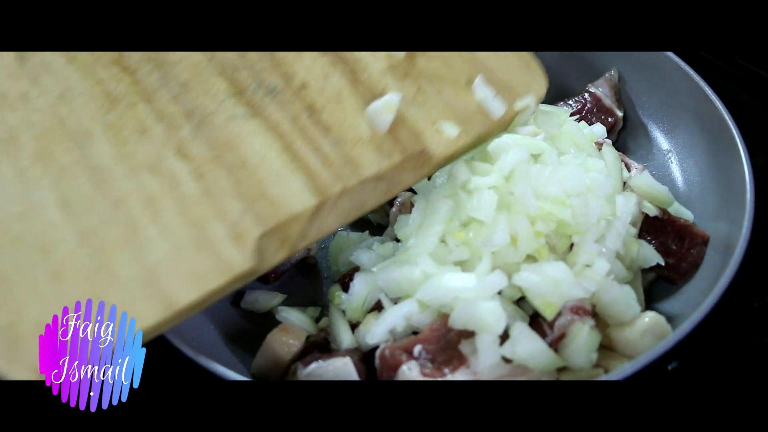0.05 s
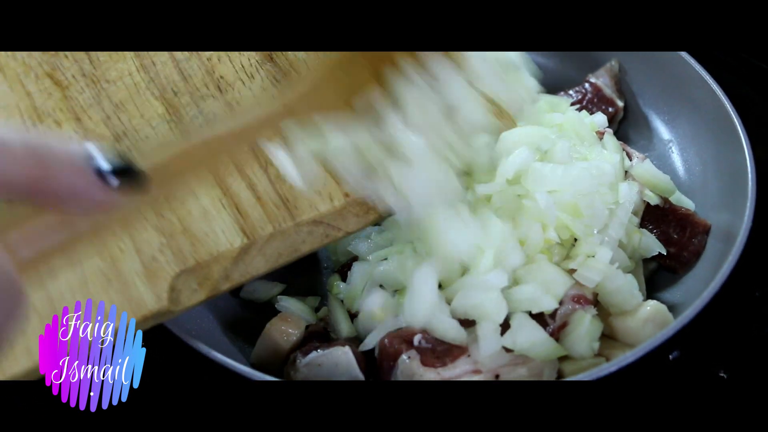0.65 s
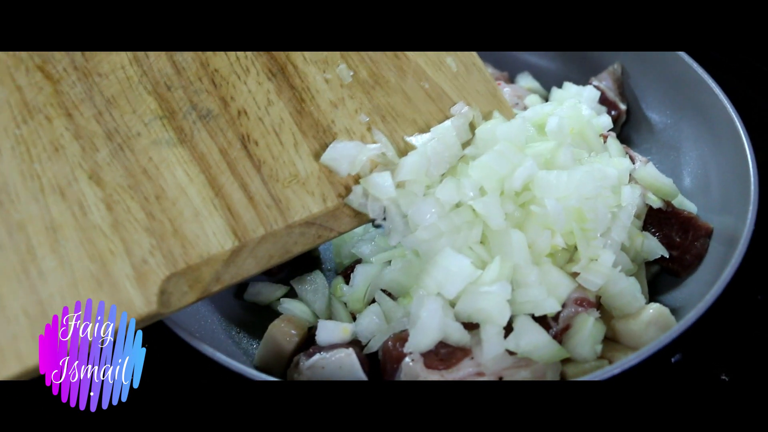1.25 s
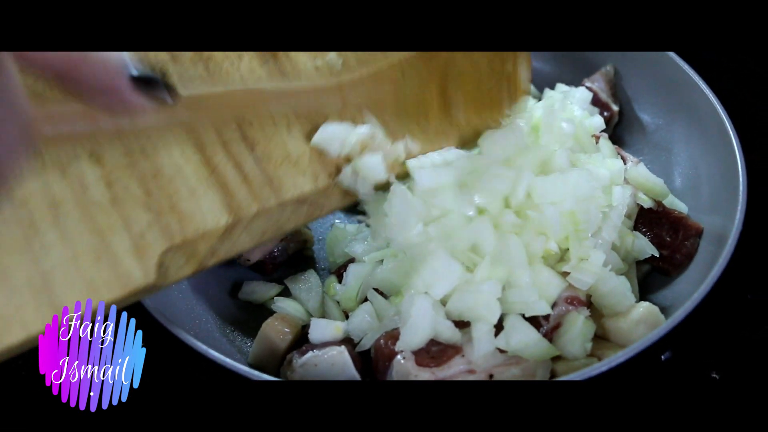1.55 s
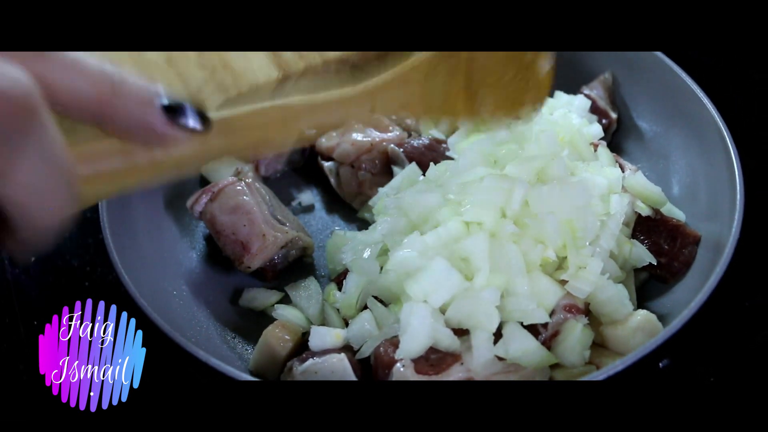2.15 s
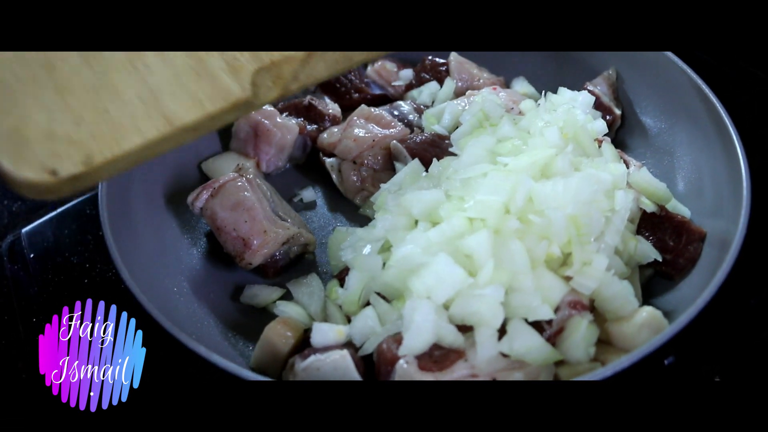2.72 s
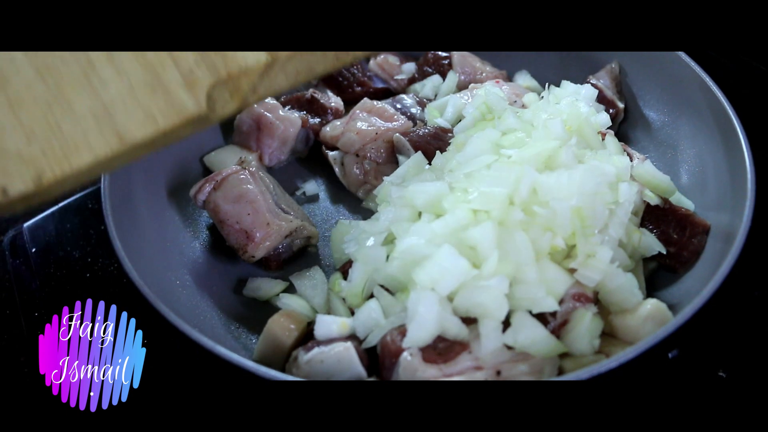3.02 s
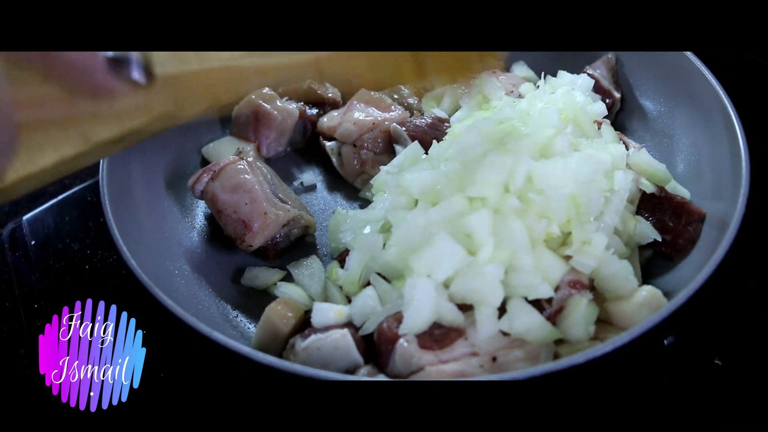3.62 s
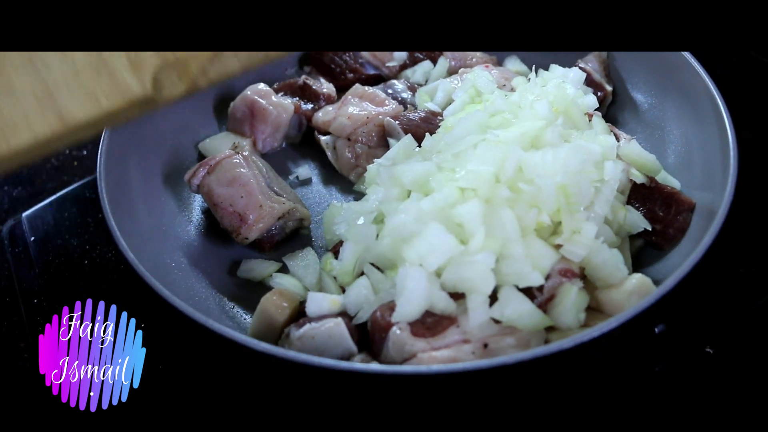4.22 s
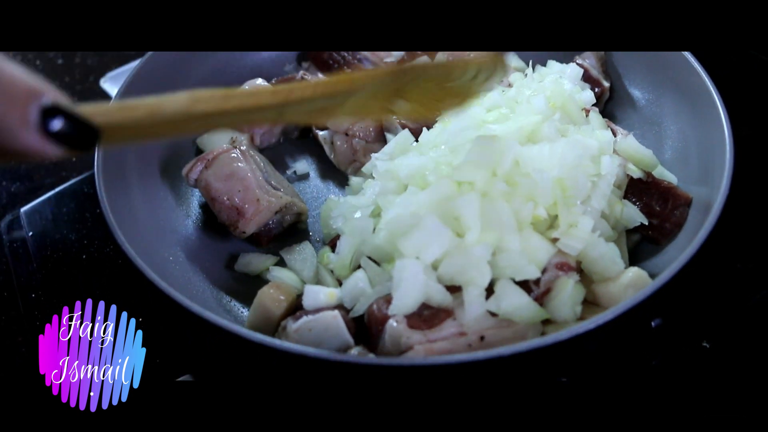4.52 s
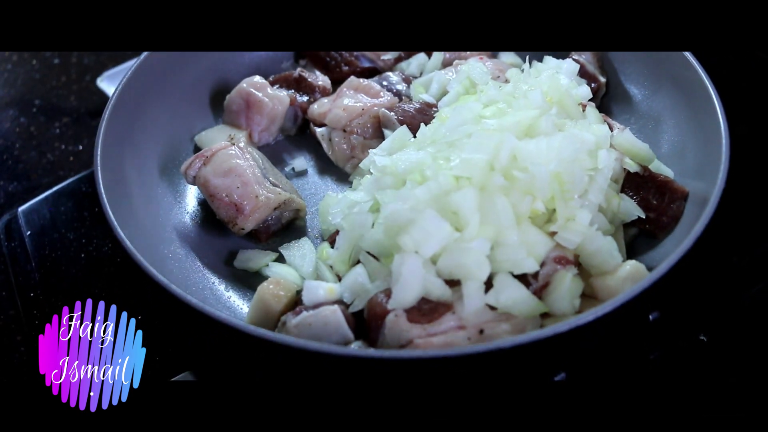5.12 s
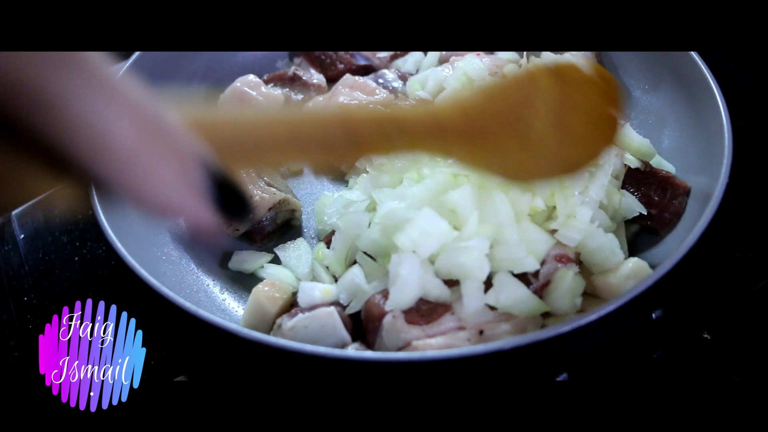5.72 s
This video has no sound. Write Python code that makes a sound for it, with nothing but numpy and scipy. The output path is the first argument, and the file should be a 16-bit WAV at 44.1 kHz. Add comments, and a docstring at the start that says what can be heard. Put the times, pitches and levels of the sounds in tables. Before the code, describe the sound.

Close rasping scrapes and loud wooden knocks on a cutting board, with onion dropping softly over a light frying sizzle.

```python
"""Rasping scrapes and sharp wooden knocks, close by in a small kitchen: a wooden spoon pushes chopped
onion off a board into a frying pan. The spoon slips and catches on the grain, ringing both itself and
the board, and the hardest knocks overload into a limiter. Onion drops with soft thuds. Underneath,
meat sizzles as steam bubbles burst in the fat, over a low rumble and a faint mains hum."""
import sys
import numpy as np
from scipy import signal
from scipy.fft import rfft, irfft
from scipy.io import wavfile
from scipy.ndimage import uniform_filter1d, minimum_filter1d

SR = 44100
rng = np.random.default_rng(int(sys.argv[2]) if len(sys.argv) > 2 else 0)


def to_wav(sig):
    """Store sig (one row per channel, or 1-D mono) as 16-bit WAV at the path in sys.argv[1].

    Samples outside -1..1 are clipped; the rate is SR.
    """
    pcm = np.clip(np.atleast_2d(sig), -1, 1) * 32767
    pcm = np.round(pcm).astype(np.int16)
    wavfile.write(sys.argv[1], SR, pcm.T)  # frames by channels


N = 254456
TIME, BINS = np.arange(N) / SR, np.fft.rfftfreq(N, 1 / SR)

# Pushes of the spoon over the board. Each row: start, swell time and easing time in seconds, swell and
# easing depth in dB, relative rasp, spoon and board levels at the hardest moment in dB, the spoon's
# bending resonance in Hz, favoured grain resonance in Hz, treble slope in dB per octave.
PUSHES = [ (0.0, 0.047, 0.056, 2.5, 6, -29.5, -24, -23, 1259, 1600, 0.5),
          (0.104, 0.034, 0.022, 10.5, 6, -29, -26, -17.5, 1340, 5800, 2),
          (0.172, 0.35, 0.02, 17.5, -4, -38, -41, -23.5, 1330, 3350, 4.5),
          (0.514, 0.068, 0.056, 4, 2.5, -24, -20.5, -24.5, 1315, 3350, -3),
          (0.64, 0.039, 0.05, 2.5, 3.5, -25.5, -25.5, -29.5, 1318, 5200, 1),
          (1.112, 0.278, 0.029, 16.5, 7, -20.5, -24.5, -21.5, 1336, 2770, -3.5),
          (1.41, 0.095, 0.078, 4.5, 4.5, -21, -23.5, -22, 1318, 3770, -1.5),
          (1.87, 0.13, 0.06, 13, 5.5, -24, -29, -21, 1292, 2760, -2),
          (2.04, 0.03, 0.09, 5, 3.5, -24.5, -23, -30, 1311, 5900, 0.5),
          (2.597, 0.022, 0.029, 8, 4, -26.5, -24, -24.5, 1315, 5430, -1.5),
          (2.651, 0.057, 0.041, 7.5, 7.5, -26.5, -25, -20.5, 1318, 5600, -1),
          (2.768, 0.1, 0.021, 8, 4.5, -20, -24.5, -28, 1313, 6300, 0.5),
          (3.33, 0.11, 0.078, 10, 7, -23, -19, -20.5, 1335, 5140, -2),
          (3.51, 0.13, 0.012, 6.5, 2.5, -23, -25, -24, 1281, 5960, 1.5),
          (4.058, 0.078, 0.044, 13.5, 9, -25, -25, -22.5, 1293, 2750, 0),
          (5.203, 0.061, 0.029, 7, 6.5, -27, -25.5, -21, 1280, 8400, -0.5)]
RASP, SPOON, BOARD = 5, 6, 7  # the level columns


def amp(db):
    """Decibels to gain."""
    return 10 ** (np.asarray(db) / 20)


def unit(x):
    """Scales to rms 1."""
    return x / np.sqrt(np.mean(x ** 2) + 1e-20)


def read(points, hz):
    """Reads a curve on a log-frequency axis."""
    point_hz, value = np.transpose(points)
    return np.interp(np.log(hz + 1), np.log(point_hz + 1), value)


def add(mix, start_s, sound):
    """Mixes a sound in at its start time."""
    part = mix[max(round(start_s * SR), 0):][:len(sound)]
    part += sound[:len(part)]


def colour(x, db):
    """Equalises by a dB curve over BINS and scales to rms 1."""
    return unit(irfft(rfft(x) * amp(db), N))


def wander(hz):
    """A random drift of rms 1, moving at up to about the given rate."""
    knots = np.arange(0, TIME[-1] + 1, .5 / hz)
    return unit(np.interp(TIME, knots, rng.standard_normal(len(knots))))


def resonate(x, hz, width_hz):
    """A band-pass resonance of gain 1."""
    return signal.lfilter(*signal.iirpeak(hz, hz / width_hz, SR), x)


def ring(slips, hz, width_hz):
    """One steep-sided resonance, which every slip drives with a random strength."""
    drive = slips * rng.standard_normal(N)
    return resonate(resonate(drive, hz, 1.18 * width_hz), hz, 3.8 * width_hz)


def clicks(per_s, spread_db):
    """Random clicks of either sign, a few louder than the rest."""
    size = amp(spread_db * np.minimum(rng.exponential(1, N), 5))
    return unit(size * rng.choice([-1, 1], N) * (rng.random(N) < per_s / SR))


def room_tone(rumble_db=-48, hum_hz=98, hum_db=-52, waver_db=2):
    """A bed of low room rumble and wavering mains hum."""
    # The rumble's colour. Each row: frequency in Hz, relative level in dB.
    rumble_eq = [(15, 0.5), (30, 2.5), (55, -12), (85, -3.5), (125, -9), (200, -10.5), (320, -7),
                 (700, -56)]
    hum = np.sqrt(2) * np.sin(2 * np.pi * hum_hz * TIME) * amp(hum_db + waver_db * wander(1.56))
    return hum + amp(rumble_db) * colour(rng.standard_normal(N), read(rumble_eq, BINS))


def kitchen(x, near_db=-15, near_t60=0.051, tail_db=-18):
    """Adds quick echoes from pan and stove top, then the faint tail of the room."""
    # The room's decay. Each row: frequency in Hz, t60 in seconds.
    decay_times = [(100, 0.63), (500, 0.72), (1300, 0.52), (4000, 0.48), (14000, 0.23)]
    t = np.arange(SR // 2) / SR
    early, late = rng.standard_normal((2, len(t)))
    early *= amp(-60 * t / near_t60) * (t > .002)
    hz, frame_s, bands = signal.stft(late * (t > .008), SR, nperseg=256)
    bands *= amp(-60 * frame_s / read(decay_times, hz)[:, None])
    late = signal.istft(bands, SR, nperseg=256)[1][:len(t)]
    echoes = amp(near_db) * early / np.linalg.norm(early) + amp(tail_db) * late / np.linalg.norm(late)
    return x + signal.fftconvolve(x, echoes)[:N]


def sizzle(pops_db=-5, flicker_db=1.5, open_at_s=1.6, opening_s=3):
    """Countless steam bubbles burst in the fat; the hiss opens up as the board is drawn away."""
    # The sizzle's fader. Each row: time in seconds, level in dB.
    fader = [(0, -36), (1.0, -37), (1.75, -38.5), (2.3, -36), (3.1, -35), (3.85, -34.5), (4.5, -33.5),
             (5.77, -32)]
    # Its colour, shaded by the board and in the open. Each row: frequency in Hz, relative level in dB.
    shaded_eq = [(150, -4), (400, -5), (900, -5), (1200, -1), (1900, -5.5), (2600, -4.5), (3600, -7),
                 (5200, -6), (7000, -7), (10000, -12.5), (13500, -16), (15700, -24)]
    open_eq = [(150, -4.5), (400, -6), (900, -2.5), (1200, -2), (1900, -0.5), (2600, -0.5), (3600, -2.5),
               (5200, -2.5), (7000, -4), (10000, -9.5), (13500, -12.5), (15700, -19.5)]
    # Peaks and dips from echoes in the pan. Each row: centre and width in Hz, gain in dB.
    pan_eq = [(1240, 190, 3.5), (2570, 120, 2.5), (5050, 1100, 1), (6400, 530, -3.5), (6890, 180, 5.5),
              (8900, 150, 4), (9000, 390, -4), (10200, 360, 2.5)]
    bursts = rng.standard_normal(N) * amp(flicker_db * wander(36))
    bursts += amp(pops_db) * clicks(per_s=1500, spread_db=1.0)
    pan_db = sum(db * np.exp(-2 * ((BINS - hz) / width) ** 2) for hz, width, db in pan_eq)
    shaded = colour(bursts, read(shaded_eq, BINS) + pan_db)
    bright = colour(bursts, read(open_eq, BINS) + pan_db)
    uncovered = np.clip((TIME - open_at_s) / opening_s, 0, 1)
    hiss = (1 - uncovered) * shaded + uncovered * bright
    return hiss * amp(np.interp(TIME, *np.transpose(fader)))


def thuds(thump_hz=80, thump_rise_s=0.012, thump_trim_db=-4.5, plop_rise_s=0.0048):
    """Soft lumps land: a low thump and a brief dull plop."""
    # Onion and board meet the pan. Each row: start in seconds, relative thump and plop levels in dB,
    # plop pitch in Hz.
    landings = [(0.123, -22.5, -22, 455), (0.18, -31, -28, 468), (0.203, -27, -33.5, 450),
                (0.245, -29.5, -41, 400), (0.375, -27.5, -28, 490), (0.45, -42, -24.5, 640),
                (0.834, -27, -28, 450), (0.872, -35, -37, 475), (2.461, -30.5, -35.5, 377),
                (4.743, -34, -30, 370), (5.262, -47, -31, 329)]
    out, t = np.zeros(N), np.arange(SR // 5) / SR
    swell = lambda rise_s: t / rise_s * np.exp(1 - t / rise_s)
    band = lambda hz, width: unit(resonate(resonate(rng.standard_normal(len(t)), hz, width), hz, width))
    for start, thump_db, plop_db, plop_hz in landings:
        thump = amp(thump_db + thump_trim_db) * swell(thump_rise_s) * band(thump_hz, width=128)
        plop = amp(plop_db) * swell(plop_rise_s) * band(plop_hz, width=130)
        add(out, start, thump + plop)
    return out


def knocks(crack_t60=0.029, crack_trim_db=-4, board_hz=497, board_t60=0.06, spoon_hz=1320, favour_db=3):
    """A short contact rings the wood; the softer it is (onion in between), the less treble."""
    # Spoon hits on the board. Each row: start in seconds, wood level in dB, low-pass corner and favoured
    # resonance in Hz, crack and spoon levels in dB, spoon t60 in seconds, board level in dB.
    hits = [(0.1205, -25, 6500, 1020, -18.5, -9, 0.022, -23),
            (0.5635, -36, 12000, 3350, -26, -22, .02, -37),
            (1.0842, -2, 13900, 5240, -11, -29, 0.015, -17.5),
            (1.8532, -1.5, 14100, 3120, -6.5, 1, 0.02, -24.5),
            (2.5425, -28, 11000, 5500, -37, -32, .02, -32),
            (2.607, -18, 6500, 5270, -18, -11.5, 0.031, -45),
            (2.774, -17.5, 7500, 5700, -35, -31, 0.024, -23),
            (3.2766, -7, 7000, 1030, -7.5, 1.5, 0.02, -20), (3.648, -11, 6440, 5500, -21, -23, .03, -27),
            (4.0083, -4.5, 5900, 1020, -7, 0, 0.024, -21.5),
            (4.2585, -13.5, 7800, 4800, -19, -20.5, 0.046, -44),
            (4.3305, -12, 7040, 2800, -39, -29, 0.016, -37),
            (4.3321, -33, 2980, 2640, -36, -0.5, 0.044, -33), (5.0568, -9, 2270, 845, -2, 2, 0.022, -23),
            (5.0655, -18, 2290, 2350, -11.5, -5.5, 0.049, -35)]
    # The wood's modes. Each row: pitch in Hz, relative level in dB, t60 in seconds.
    wood_modes = [(1050, -15, 0.02), (1530, 0, 0.01), (1593, -7.5, 0.024), (1980, -46, 0.03),
                  (2570, -12, 0.026), (2883, -7.5, 0.021), (3260, -19, 0.026), (3890, -10, .02),
                  (4430, -10, 0.02), (5350, -6, 0.015), (5720, -8.5, 0.016), (6420, -1.5, 0.0046),
                  (8650, -7.5, 0.011), (10100, -5.5, 0.0044)]
    # The crack's colour. Each row: frequency in Hz, relative level in dB.
    crack_eq = [(120, -22), (450, -4), (750, 1), (1300, 3), (2200, 2), (5500, -6.5), (7500, -10),
                (10000, -12), (16000, -20)]
    out, t = np.zeros(N), np.arange(SR // 6) / SR
    noise = colour(rng.standard_normal(N), read(crack_eq, BINS))
    mode = lambda hz, db, t60: amp(db - 60 * t / t60) * np.sin(2 * np.pi * hz * t)
    for k, hit in enumerate(hits):
        start, wood_db, corner_hz, favoured_hz, crack_db, spoon_db, spoon_t60, board_db = hit
        wood = sum((-1) ** j * mode(hz, wood_db + db, t60) for j, (hz, db, t60) in enumerate(wood_modes))
        crack = noise[k * len(t):][:len(t)] * amp(crack_trim_db + crack_db - 60 * t / crack_t60)
        blow = signal.lfilter(*signal.butter(3, corner_hz, fs=SR), wood + crack)
        # the place of the blow favours one resonance
        blow += amp(favour_db) * resonate(blow, favoured_hz, 0.094 * favoured_hz)
        # the slow bending modes build up while the contact lasts
        contact_s = 2.75 / corner_hz
        bending = mode(spoon_hz, spoon_db, spoon_t60) - mode(board_hz, board_db, board_t60)
        add(out, start, blow + bending * (1 - np.exp(-(t / contact_s) ** 2)))
    # small wooden things radiate little bass
    return signal.lfilter(*signal.butter(2, 260, "high", fs=SR), out)


def after_ring(x, hz=491, width_hz=6, ring_db=-7):
    """A narrow ring near 490 Hz hums on briefly after every touch."""
    return x + amp(ring_db) * resonate(x, hz, width_hz)


def push_gain(column, follows, release_t60, fade_db=0, flick_db=0, attack_s=0.0061, flick_s=0.02):
    """One layer's envelope: each push bites, swells, eases and lifts off; follows scales the swell."""
    power = np.zeros(N)
    for push in PUSHES:
        start, swell_s, ease_s, swell_db, ease_db = push[:5]
        length = swell_s + ease_s
        t = np.arange(0, length + release_t60, 1 / SR)
        before, after = np.interp(t, [0, swell_s], [1, 0]), np.interp(t, [swell_s, length], [0, 1])
        pressure_db = -swell_db * before ** 1.02 - ease_db * after ** 1.02
        touch = np.minimum(t / attack_s, 1) * amp(-60 * np.maximum(t - length, 0) / release_t60)
        travel = np.interp(t, [0, length], [-.5, .5])
        flick = np.interp(t, [length - flick_s, length], [0, 1])  # over the board's edge
        level_db = push[column] + follows * pressure_db - fade_db * travel + flick_db * flick
        add(power, start, (touch * amp(level_db)) ** 2)
    return np.sqrt(power)


def squawk_gain(ring_on_db=-17, ring_on_t60=0.15):
    """Each catch on the grain swells and dies in one arch, and the spoon rings on faintly after it."""
    # The spoon's squawks. Each row: midpoint and length in seconds, relative level in dB.
    squawks = [(0.045, 0.025, -21), (0.121, 0.021, -16), (0.587, 0.07, -14), (1.236, 0.056, -13.5),
               (1.287, 0.063, -13), (1.352, 0.05, -15.5), (1.493, 0.056, -15), (1.906, 0.068, -22.5),
               (2.052, 0.11, -14.5), (2.152, 0.025, -19), (2.799, 0.044, -12), (2.882, 0.044, -11),
               (3.376, 0.078, -15), (3.431, 0.05, -13), (3.543, 0.028, -14.5), (3.642, 0.029, -10),
               (4.126, 0.053, -17.5)]
    gain, t = np.zeros(N), np.arange(SR // 3) / SR
    for middle, length, db in squawks:
        progress = np.minimum(t / length, 1)
        arch = np.sin(np.pi * progress)
        ring_on = progress * amp(ring_on_db - 60 * np.maximum(t - length, 0) / ring_on_t60)
        add(gain, middle - length / 2, amp(db) * np.maximum(arch, ring_on))
    return gain


def push_tone(sag=0.021, brighten_db_per_octave=0.5):
    """The tone of each push: the pitch sags and the treble grows as the spoon nears the board's edge."""
    start, swell_s, ease_s, *_, spoon_hz, favoured_hz, slope = np.transpose(PUSHES)
    now = np.maximum(np.searchsorted(start, TIME, "right") - 1, 0)
    travel = np.clip((TIME - start[now]) / (swell_s + ease_s)[now], 0, 1) - .5
    pitch_hz = spoon_hz[now] * (1 - sag * travel)
    return pitch_hz, favoured_hz[now], slope[now] + brighten_db_per_octave * travel


def board_body(slips):
    """The slips ring the board's low resonances, giving the scrape its body."""
    # The board's resonances. Each row: centre and width in Hz, relative level in dB.
    modes = [(308, 44, -14), (493.4, 20.4, 1), (545, 50, 1), (605, 63, -7), (741, 65, -10.5),
             (900, 65, -5.5), (1034, 68, -2.5)]
    body = unit(sum(amp(db) * ring(slips, hz, width) for hz, width, db in modes))
    return body * push_gain(BOARD, follows=1.1, release_t60=0.12, fade_db=3)


def spoon_ring(slips, pitch_hz, drift=0.0016, width_hz=38, skirt_hz=500):
    """The slips drive the spoon's bending resonance, which friction damps."""
    # the pitch drifts as the contact moves along the spoon's edge
    carrier = np.exp(2j * np.pi * np.cumsum(pitch_hz * (1 + drift * wander(13))) / SR)
    poles = np.exp(-np.pi * np.array([width_hz, skirt_hz]) / SR)
    swing = signal.lfilter([1], np.poly(poles), slips / carrier)
    # friction feeds small swings and brakes large ones
    swing /= (uniform_filter1d(abs(swing), size=900) + 1e-9) ** 0.59
    gain = np.hypot(push_gain(SPOON, follows=0.87, release_t60=0.11), squawk_gain())
    return gain * unit((swing * carrier).real)


def rasp(slips, favoured_hz, slope, favour_db=5, favour_octaves=0.075, waver_db=4, fizz_db=-27):
    """The wood's upper resonances trade strength as the contact travels; slope tilts their treble."""
    # The grain's resonances. Each row: centre and width in Hz, relative level in dB.
    modes = [(1416, 167, 5.5), (1600, 34, 1), (1898, 56, 2), (2602, 243, 3), (2926, 88, 1),
             (3326, 290, -3.5), (3816, 136, -2), (4205, 68, 1), (4625, 210, -3), (5320, 194, 3),
             (5780, 600, -3.5), (6420, 86, -2), (6960, 250, -8), (8380, 550, -8), (9780, 520, -10.5),
             (11950, 490, -14.5), (13800, 790, -22)]
    grain = np.zeros(N)
    for hz, width, db in modes:
        place_db = favour_db * np.exp(-(np.log2(hz / favoured_hz) / favour_octaves) ** 2)
        # a broad resonance is a cluster of modes, so it wavers less
        place_db += waver_db * np.sqrt(100 / width) * wander(11)
        grain += amp(db + place_db + slope * np.log2(hz / 4000)) * ring(slips, hz, width)
    # juice squeezed under the edge adds a thin fizz on top
    fizz = signal.lfilter(*signal.butter(2, 10000, "high", fs=SR), slips)
    grit = unit(unit(grain) + amp(fizz_db + slope) * unit(fizz))
    return grit * push_gain(RASP, follows=0.89, release_t60=0.035, flick_db=2.5)


def scrape(catch_db=1.5, catch_hz=80, spoon_db=-1, board_db=-2.5, rasp_db=1.5, lumps_db=1.17):
    """Tiny slips of the spoon over the grain, stronger where it catches, ring spoon and board."""
    slips = clicks(per_s=12000, spread_db=1.2) * amp(catch_db * wander(catch_hz))
    pitch_hz, favoured_hz, slope = push_tone()
    spoon = amp(spoon_db) * spoon_ring(slips, pitch_hz)
    board = amp(board_db) * board_body(slips)
    grit = amp(rasp_db) * rasp(slips, favoured_hz, slope)
    # lumps of onion under the spoon make its grip on the board uneven
    return spoon + (board + grit) * amp(lumps_db * wander(16))


def scene():
    """Spoon and board in the kitchen, over the sizzling pan and the room tone, in mono."""
    wood = after_ring(scrape() + knocks() + thuds())
    return (kitchen(wood) + sizzle() + room_tone())[None]


def record(dry, ceiling=2.0, top_hz=15820):
    """A fast limiter tames the hardest knocks, what is left of them clips, and a low-pass follows."""
    allowed = 1 / np.maximum(abs(dry) / ceiling, 1)
    gain = uniform_filter1d(minimum_filter1d(allowed, size=25), size=25)
    clipped = np.clip(dry * gain, -1, 1)
    low_pass = signal.firwin(511, top_hz, window=("kaiser", 8), fs=SR)
    return signal.oaconvolve(clipped, low_pass[None], "same")


dry = scene()
out = record(dry)
to_wav(out)
```